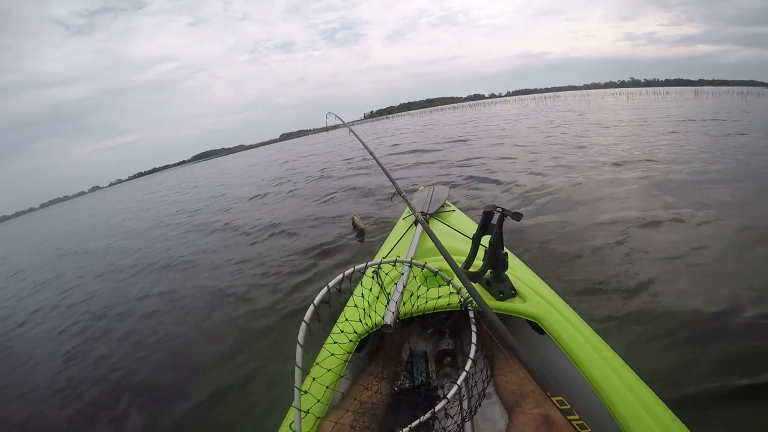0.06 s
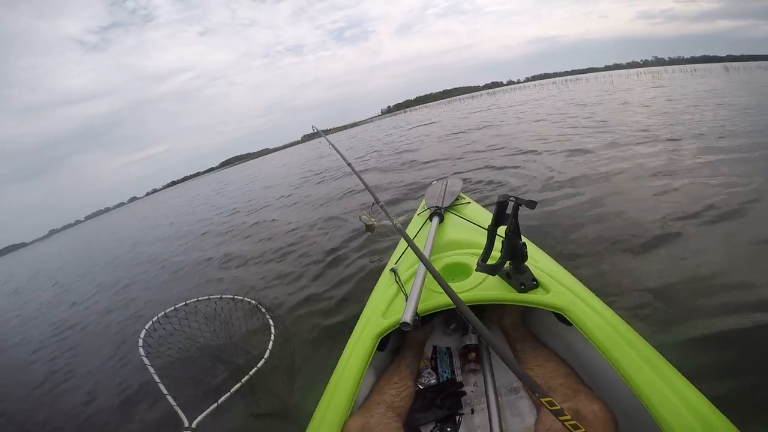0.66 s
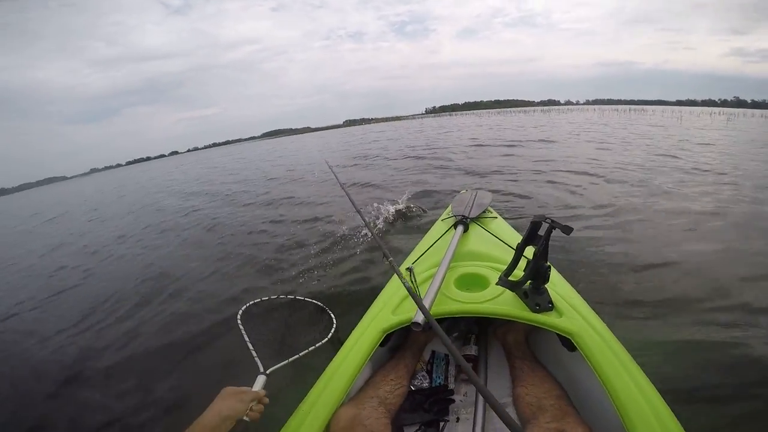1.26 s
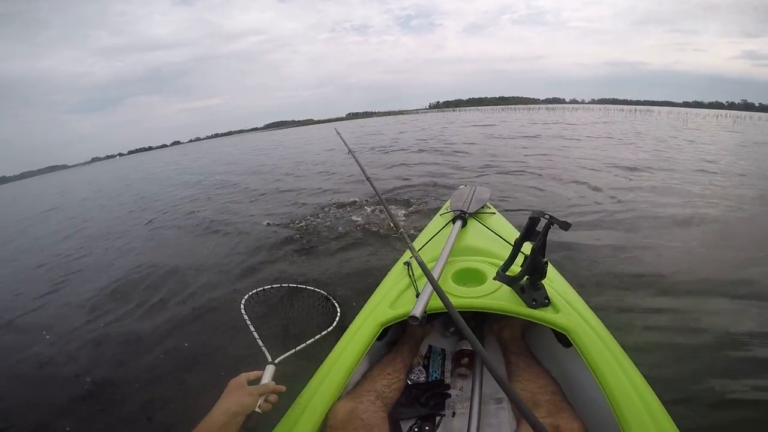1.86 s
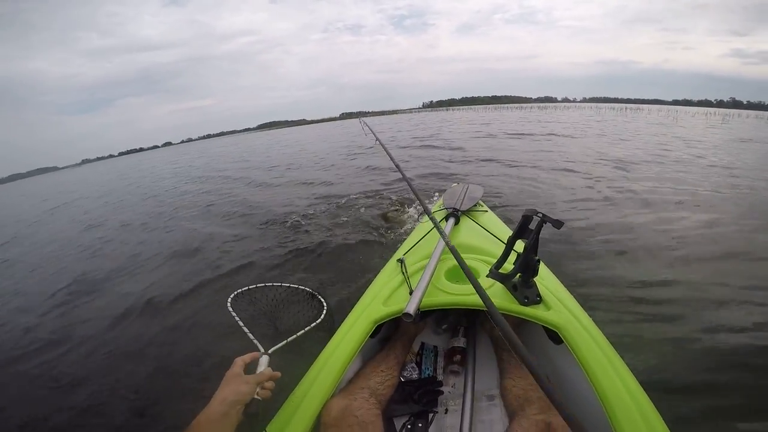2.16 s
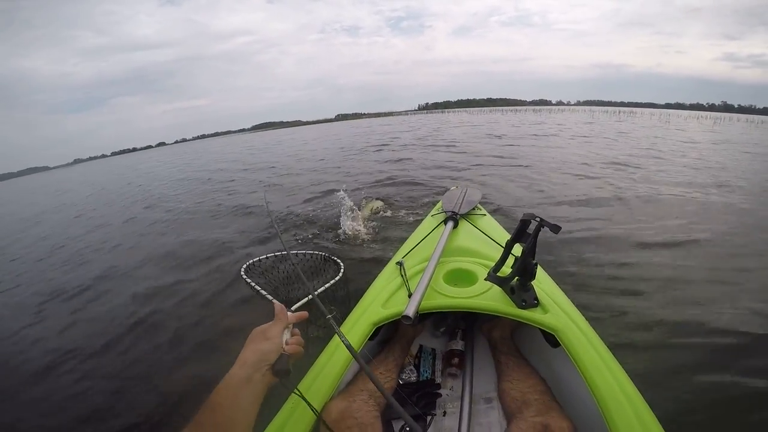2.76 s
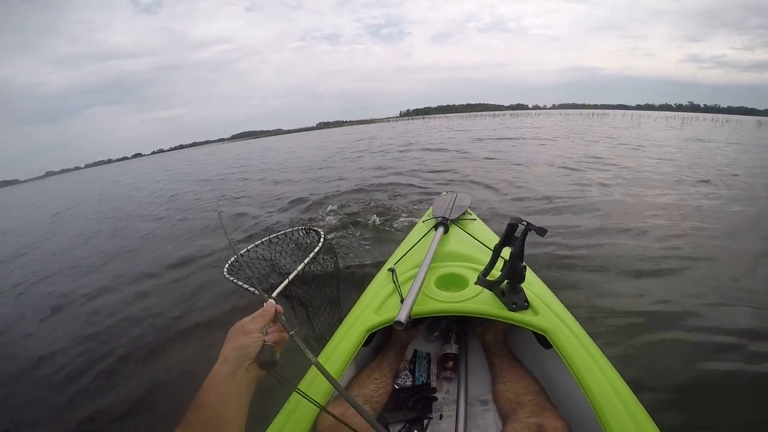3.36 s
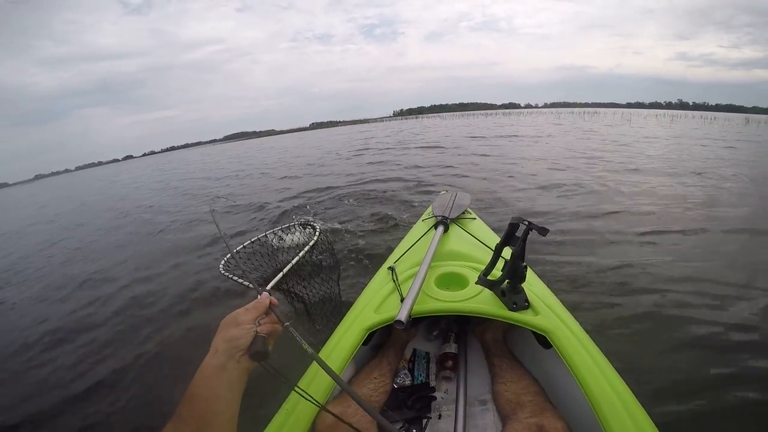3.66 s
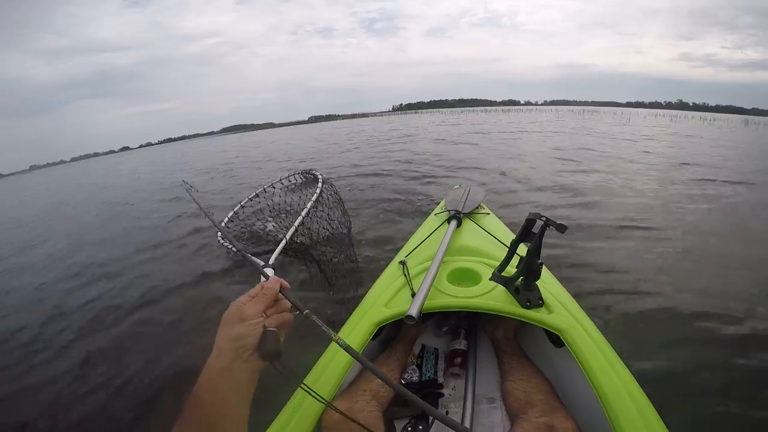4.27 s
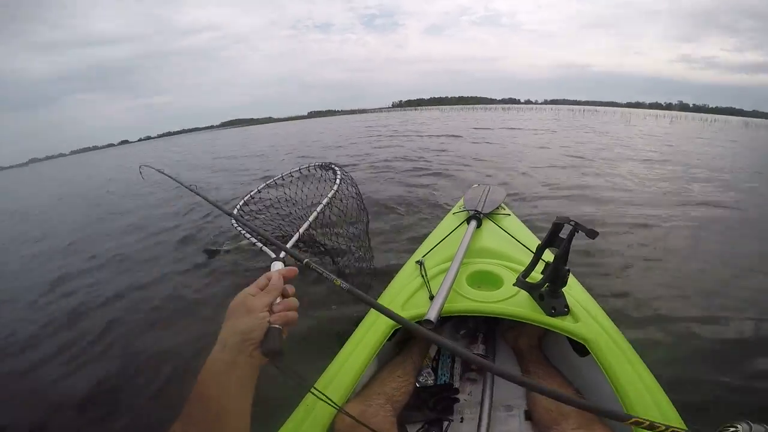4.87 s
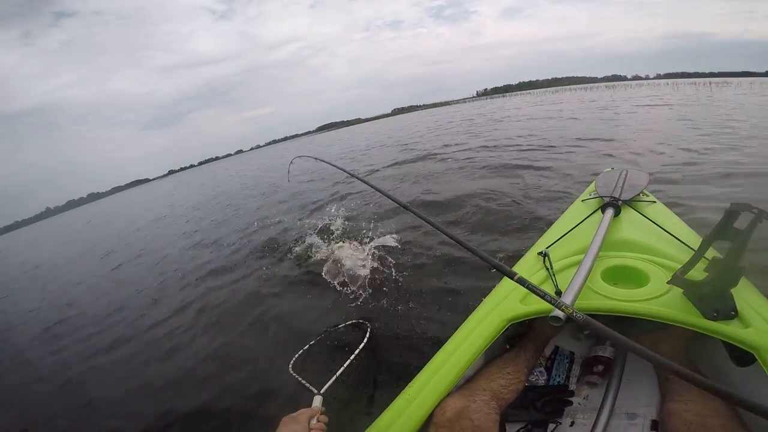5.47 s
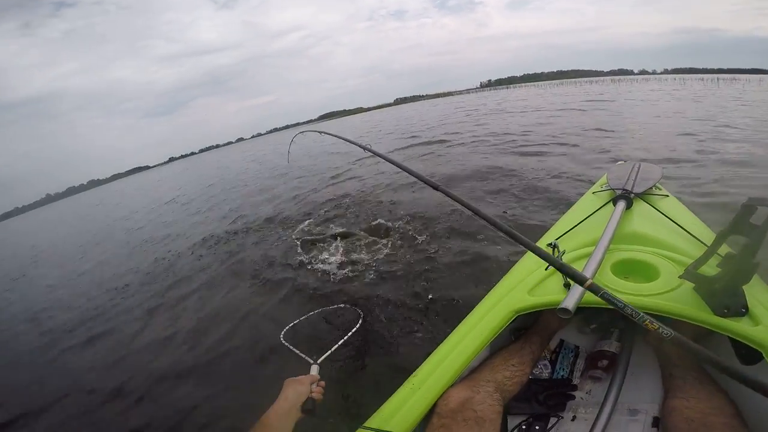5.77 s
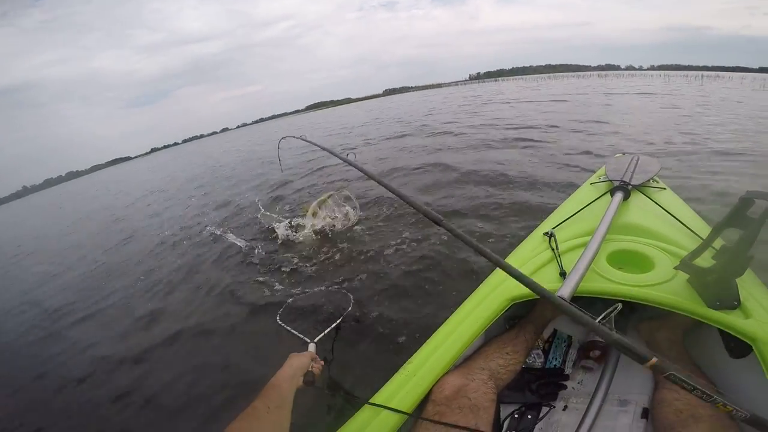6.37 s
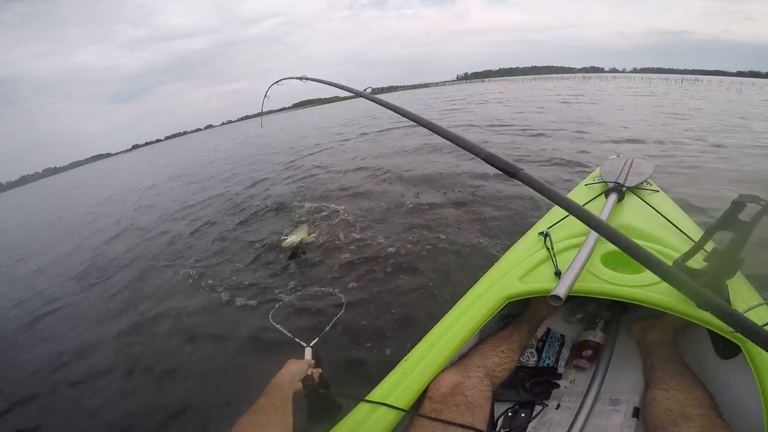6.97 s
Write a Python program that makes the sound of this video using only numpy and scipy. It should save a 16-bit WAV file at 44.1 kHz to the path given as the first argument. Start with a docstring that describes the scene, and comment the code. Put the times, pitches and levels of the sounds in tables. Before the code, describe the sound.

Bursts of splashing and plopping from a fish fighting next to a kayak, pausing briefly, over faint wind rumble and hiss.

```python
"""A kayak on open water, heard from the seat through the ringing plastic housing of a body-worn camera.
Low wind rumble, hiss and a thin electronic whine run throughout. First the line rubs, the reel ticks and
the tackle knocks. Just after 1 s a hooked fish thrashes alongside: drops plink, sheets of spray fly, the
tail slaps, air pockets gulp shut, the hull takes one dull bump and tiny drops land close by. Near 4 s the
fish rests and the tackle knocks and rustles; from 5.2 s it thrashes again and the wind buffets harder."""
import sys
import numpy as np
from scipy import signal
from scipy.fft import rfft, irfft, next_fast_len
from scipy.io import wavfile
from scipy.ndimage import uniform_filter1d, map_coordinates

SR = 44100
rng = np.random.default_rng(int(sys.argv[2]) if len(sys.argv) > 2 else 0)


def dump_mix(stems):
    """Bounce the given channels to the path in sys.argv[1] as a 16-bit WAV at rate SR."""
    frames = np.atleast_2d(stems).T  # one column per channel
    limited = np.clip(frames, -1, 1)  # hard clip at full scale
    pcm = np.round(limited * 32767).astype(np.int16)
    wavfile.write(sys.argv[1], SR, pcm)


N = 309582


def amp(db):
    """Decibels to gain."""
    return 10 ** (np.asarray(db) / 20)


def unit(x):
    """Scale to rms 1."""
    return x / np.sqrt(np.mean(x ** 2) + 1e-20)


def clock(count):
    """Sample times in seconds."""
    return np.arange(count) / SR


def wobble(rate):
    """A smooth random curve with rate knots a second."""
    return map_coordinates(rng.standard_normal(int(N * rate / SR) + 4), [clock(N) * rate])


def swell(start_s, attack_s, hold_s, t60_s):
    """Rise, hold, then die away."""
    t = clock(N) - start_s
    return np.clip(t / attack_s, 0, 1) * amp(-60 * np.clip((t - attack_s - hold_s) / t60_s, 0, 2))


def filtered(x, response):
    """Multiply the spectrum of x by a response of frequency."""
    size = next_fast_len(len(x) + 4096)
    return irfft(rfft(x, size) * response(np.fft.rfftfreq(size, 1 / SR)), size)[:len(x)]


def coloured(x, points):
    """Shape x by (frequency_hz, level_db) points on a log axis."""
    hz, db = np.transpose(points)
    return filtered(x, lambda f: amp(np.interp(np.log(f + 1), np.log(hz), db)))


def resonate(x, modes):
    """Ring (pitch_hz, width_hz, gain_db) resonances with x."""
    return filtered(x, lambda f: sum(amp(db) * 1j * f * width / (hz * hz - f * f + 1j * f * width)
                                     for hz, width, db in modes))


def band(x, edge_hz, kind, order):
    """Causal low, high or band pass."""
    sections = signal.butter(order, np.clip(edge_hz, 1, SR / 2 - 1), kind, fs=SR, output="sos")
    return signal.sosfilt(sections, x)


def noise_burst(t, t60_s):
    """White noise that falls 60 dB in t60_s."""
    return rng.standard_normal(len(t)) * amp(-60 * t / t60_s)


def add(track, start_s, sound, level_db):
    """Mix a sound in with its loudest 2 ms at level_db."""
    power = uniform_filter1d(sound ** 2, 88).max()
    part = track[max(round(start_s * SR), 0):][:len(sound)]
    part += amp(level_db) * sound[:len(part)] / np.sqrt(power + 1e-20)


# wind on the microphone, stronger while the rod is hauled up: time_s, level_db
WIND = [(0, -55), (1.1, -50), (2.7, -47.5), (4.2, -49.5), (5.25, -48), (5.5, -40), (6.75, -40),
        (7.02, -44.5)]
# gusts on top of it: centre_s, rise_db, half_length_s
GUSTS = [(1.36, 10, .11), (4.607, 4.5, 0.13), (5.556, 4.5, .04), (5.979, 9.5, 0.045), (6.781, 7, 0.013)]
# spectra of buffeting and of handling, right on the housing: frequency_hz, relative_db
BUFFET_SPECTRUM = [(10, -22), (20, 2), (32, -2.5), (48, -2), (58, -6.5), (72, -29.5), (150, -48.5),
                   (400, -100)]
HANDLING_SPECTRUM = [(35, -6), (55, 4), (66, 4), (80, -5.5), (100, -10), (130, -21), (180, -48),
                     (400, -44.5), (1000, -100)]
def wind_rumble():
    """Wind buffets the microphone, and handling rumble on the housing swells with it."""
    t = clock(N)
    gusts_db = sum(db * np.exp(-((t - centre_s) / half_s) ** 2) for centre_s, db, half_s in GUSTS)
    flutter_db = 1.43 * wobble(rate=7)
    wind_db = np.interp(t, *np.transpose(WIND)) + gusts_db + flutter_db
    calm_db = -50
    handling_db = -58.5 + 1.23 * (wind_db - calm_db)
    buffeting = amp(wind_db) * unit(coloured(rng.standard_normal(N), BUFFET_SPECTRUM))
    handling = amp(handling_db) * unit(coloured(rng.standard_normal(N), HANDLING_SPECTRUM))
    return buffeting + handling


# the microphone's noise floor: frequency_hz, relative_db
HISS_SPECTRUM = [(60, 6), (150, 7.5), (300, 0.5), (600, -4.5), (1200, -7), (2200, -9), (2900, -8),
                 (4000, -11), (6000, -9.5), (7300, -16), (8600, -15.5), (9500, -18.5), (13500, -18.5),
                 (15000, -22.5)]
def microphone_hiss():
    """The microphone's own steady noise lies under everything."""
    return amp(-63) * unit(coloured(rng.standard_normal(N), HISS_SPECTRUM))


def camera_whine(pitch_hz=6308.7, frame_hz=29.97):
    """The camera's electronics sing at one pitch, restarting with every picture frame."""
    phase = 2 * np.pi * pitch_hz * (clock(N) % (1 / frame_hz))
    return np.sqrt(2) * (amp(-68) * np.sin(phase) + amp(-85.5) * np.sin(2 * phase))


# strokes of line and net, within reach: start_s, relative_db, attack_s, hold_s, t60_s
RUBS = [(0, -63, 0.0072, 0.025, .5), (0.734, -72, .04, .04, .2), (4.798, -60.5, 0.11, 0.11, 0.45)]
# spectrum of the rubbing: frequency_hz, relative_db
RUB_SPECTRUM = [(1000, -36), (2000, 2.5), (2600, -5), (3050, 10), (3600, -6), (4400, 0.5), (5100, -6),
                (5600, -19), (6900, -11), (7500, -9), (8500, -22), (15000, -30)]
def line_rubs():
    """Line and net stick and slip, rustling unevenly through each stroke."""
    slips = rng.standard_normal(N) * amp(3.5 * wobble(rate=110))
    strokes = sum(amp(db) * swell(start_s, *shape) for start_s, db, *shape in RUBS)
    return amp(-3.5) * strokes * unit(coloured(slips, RUB_SPECTRUM))


# clicks of the reel, in the hand: start_s, relative_db
REEL_TICKS = [(0.041, -46), (0.781, -48), (0.8, -43), (0.825, -50.5), (5.0035, -46)]
# resonances of the reel: pitch_hz, width_hz, gain_db
REEL_MODES = [(2900, 740, -4), (4310, 430, 3), (4770, 460, -7), (7200, 470, -23)]
def reel_ticks():
    """Each small click rings the reel briefly."""
    out, t = np.zeros(N), clock(8192)
    for start_s, db in REEL_TICKS:
        ring = resonate(noise_burst(t, t60_s=0.04), REEL_MODES)
        add(out, start_s, band(ring, 7000, "low", order=2), db - 8)
    return out


# knocks of rod and net, aboard the kayak: start_s, relative_db, t60_s, cutoff_hz
KNOCKS = [(0.297, -42.5, 0.067, 5060), (4.122, -37.5, 0.086, 6300), (4.205, -54, 0.09, 4000),
          (4.268, -58, .06, 6000), (5.18, -46.5, 0.1, 2400)]
# resonances of the tackle: pitch_hz, width_hz, gain_db
TACKLE_MODES = [(1160, 210, -3), (2010, 210, 2), (2490, 260, 8), (2750, 200, 1), (2860, 180, 6),
                (3960, 110, 4), (5100, 400, -10), (5900, 620, -26), (7400, 410, -31)]
def tackle_knocks():
    """Rod and net clack together, rattle for 5 ms, then settle."""
    out, t = np.zeros(N), clock(8192)
    for start_s, db, t60_s, cutoff_hz in KNOCKS:
        chatter = noise_burst(np.maximum(t - 0.005, 0), t60_s)
        ring = resonate(chatter, TACKLE_MODES)
        add(out, start_s, band(ring, cutoff_hz, "low", order=2), db - 5.5)
    return out


# resonances of the camera housing around the microphone: pitch_hz, width_hz, gain_db
HOUSING_MODES = [(960, 530, -11), (1490, 89, -6.5), (2036, 220, 0.5), (2738, 470, 2.5), (2926, 106, -4.5),
                 (4240, 600, -3.5), (4893, 200, 4.5), (5640, 390, -4), (6060, 190, -2.5), (7460, 270, -4),
                 (9900, 2400, -13.5), (13100, 3800, -10)]
def housing(x):
    """The plastic shell rings at its resonances and leaks a little of everything."""
    return band(resonate(x, HOUSING_MODES), 6200, "low", order=1) + amp(-22) * x


def bubble(t, pitch_hz, t60_s, rise):
    """A bubble rings and, nearing the surface, climbs in pitch by the share rise every t60_s."""
    phase = 2 * np.pi * pitch_hz * t * (1 + rise * t / t60_s / 2)
    return np.sin(phase) * amp(-60 * t / t60_s)


# single drops on the water beside the kayak: start_s, relative_db, pitch_hz
PLINKS = [(1.141, -40, 4900), (1.409, -44.5, 2700), (1.499, -34, 5040), (1.993, -30, 1964),
          (2.739, -39.5, 1500), (3.168, -39, 4950), (3.207, -37, 4870), (3.372, -39, 1950),
          (5.438, -31.5, 2070), (6.28, -36, 1980), (6.748, -31, 1834), (6.778, -38, 4940)]
def drop_plinks():
    """A drop lands with a faint tick and traps one bubble that rings cleanly."""
    out, t = np.zeros(N), clock(4096)
    for start_s, db, pitch_hz in PLINKS:
        impact = 0.48 * noise_burst(t, t60_s=0.066)
        ring = bubble(t, pitch_hz, t60_s=0.024, rise=0.088)
        onset = 1 - np.exp(-t / 0.00021)
        add(out, start_s, housing((ring + impact) * onset), db - 14)
    return out


def bubble_stream(per_second, low_hz, high_hz, cycles, spread_db, samples):
    """Bubbles of many sizes ring at random times, each dying away over the same number of cycles."""
    when, pitch, strength = rng.random((int(per_second * N / SR), 3)).T[:, :, None]
    pitch_hz = low_hz * (high_hz / low_hz) ** pitch
    gain = amp(-spread_db * np.log(np.maximum(strength, 0.02)))
    rings = gain * bubble(clock(samples), pitch_hz, t60_s=cycles / pitch_hz, rise=0.66)
    positions = (when * N).astype(int) + np.arange(samples)
    return unit(np.bincount(positions.ravel(), rings.ravel(), N)[:N])


# sheets of water thrown alongside, levels relative: start_s, splash_db, spray_db, gulp_db, hold_s, t60_s
THRASHES = [(1.161, -58.5, -56, -77, 0.013, .4), (1.204, -53.5, -55.5, -65, 0.019, 0.4),
            (1.301, -61, -63.5, -68, 0.0083, 0.79), (1.507, -60, -62, -70, .015, .3),
            (1.537, -53.5, -55, -59.5, 0.057, 0.63), (1.673, -59, -59, -74, 0.13, 0.64),
            (2.031, -56.5, -62, -60, 0.019, 0.53), (2.125, -63, -66.5, -77, 0.13, 0.93),
            (2.532, -57, -61, -68, .02, 0.61), (2.657, -54, -57.5, -68, .015, .3),
            (2.728, -62, -63.5, -72, 0.13, 0.28), (2.913, -56.5, -62.5, -70, 0.061, .5),
            (3.022, -54, -57, -66.5, 0.037, 0.58), (3.1, -63.5, -62, -76, 0.15, 0.86),
            (3.23, -67, -55, -76, .012, .1), (3.338, -59, -63, -74, 0.035, 0.59),
            (3.592, -56, -58.5, -71, .005, 0.14), (3.628, -56.5, -58.5, -63, 0.032, 0.55),
            (3.766, -66, -69, -71.5, 0.18, 0.32), (5.253, -56.5, -55.5, -67, 0.044, 0.48),
            (5.31, -55, -56, -64, 0.071, 0.46), (5.406, -54.5, -53, -63.5, 0.018, 0.55),
            (5.491, -57, -56.5, -68.5, 0.13, 0.68), (5.574, -56.5, -54, -63.5, 0.059, 0.91),
            (5.779, -61, -64, -69, 0.14, 1.5), (6.126, -57.5, -62.5, -84, 0.0043, 0.34),
            (6.206, -61.5, -56, -65.5, 0.044, 0.34), (6.257, -58, -60.5, -63.5, 0.1, 0.63),
            (6.476, -60, -59, -72, 0.04, 1.46), (6.712, -58.5, -59, -64, 0.027, 0.67)]
# spectrum of gulping air: frequency_hz, relative_db
GULP_SPECTRUM = [(120, 2), (300, -5.5), (500, -8.5), (750, -5.5), (1000, -3.5), (1300, -9.5), (2000, -9),
                 (5000, -60)]
def thrashing(attack_s=0.0072):
    """Each beat of the fish tears the water into coarse bubbles, fine spray and deep gulps over foam."""
    power = np.zeros((3, N))  # overlapping sheets add in power
    for start_s, splash_db, spray_db, gulp_db, hold_s, t60_s in THRASHES:
        sheet = swell(start_s, attack_s, hold_s, t60_s)
        pockets = swell(start_s, attack_s, hold_s, 0.81 * t60_s)  # they close before the spray settles
        power[0] += (amp(splash_db) * sheet) ** 2
        power[1] += (amp(spray_db) * sheet) ** 2
        power[2] += (amp(gulp_db) * pockets) ** 2
    splash, spray, gulp = np.sqrt(power)
    violence = np.clip(spray / amp(-47), 0, 1)
    froth = 0.32 + 0.43 * violence  # in a hard thrash single bubbles merge into a wash
    foam = np.sqrt(froth) * rng.standard_normal((3, N))
    clumps = amp(1.7 * wobble(rate=140))  # the water comes down in blobs a few milliseconds long
    streams = np.array([
        bubble_stream(per_second=800, low_hz=1408, high_hz=3546, cycles=45, spread_db=1, samples=768),
        bubble_stream(per_second=1100, low_hz=3646, high_hz=10520, cycles=43, spread_db=0, samples=256),
        bubble_stream(per_second=350, low_hz=390, high_hz=1367, cycles=17, spread_db=1, samples=1400)])
    coarse, fine, deep = np.sqrt(1 - froth) * streams + foam
    coarse = unit(band(housing(clumps * coarse), [1250, 3600], "band", order=3))
    fine = unit(band(housing(clumps * fine), 3000, "high", order=4))
    deep = unit(coloured(deep, GULP_SPECTRUM))
    fizz = unit(band(rng.standard_normal(N), [8500, 14000], "band", order=2))
    mist = amp(-16) * violence * spray * fizz  # harder beats atomise more water
    return splash * coarse + amp(0.5) * spray * fine + amp(1) * gulp * deep + mist


# the hardest slaps of the fish, beside the hull: start_s, relative_db, pitch_hz, length_s
SLAPS = [(1.168, -46, 4670, 0.0043), (1.209, -42, 5020, .004), (1.229, -39, 4890, 0.005),
         (1.329, -40, 2480, 0.0044), (1.556, -54, 2130, 0.0036), (1.573, -42, 2820, 0.0081),
         (2.017, -41.5, 4610, 0.014), (2.041, -38.5, 2840, 0.003), (2.541, -40.5, 4630, 0.0027),
         (2.564, -41, 4630, 0.0037), (2.671, -35.5, 1680, .009), (2.848, -39.5, 2970, 0.0096),
         (2.922, -41.5, 2720, .005), (2.984, -38.5, 2000, 0.0045), (3.005, -38.5, 5100, .004),
         (3.09, -39, 2020, .008), (3.133, -40, 4780, .006), (3.243, -38, 4900, 0.0068),
         (3.598, -41.5, 1880, .003), (3.64, -37, 4710, 0.013), (3.684, -41, 1760, 0.0083),
         (3.921, -46.5, 3100, 0.0061), (3.981, -43.5, 2640, 0.0061), (5.241, -40, 2890, 0.0024),
         (5.31, -33.5, 5000, 0.0094), (5.423, -35.5, 2020, 0.0075), (5.465, -39, 5000, .006),
         (5.686, -31.5, 2340, 0.0027), (5.754, -39.5, 2730, .004), (6.134, -41.5, 2680, .005),
         (6.211, -41, 5470, .004), (6.491, -42.5, 2030, .004), (6.565, -36.5, 2760, .004),
         (6.71, -39, 2710, 0.0088), (6.727, -30.5, 2715, 0.0056), (6.995, -48, 2430, 0.0073)]
def tail_slaps(yield_s=0.0009):
    """Each slap is a short burst of droplets and one trapped bubble, choked off as the water closes."""
    out, t = np.zeros(N), clock(4096)
    for start_s, db, pitch_hz, length_s in SLAPS:
        envelope = np.exp(-(t / length_s) ** 2) + 0.22 * amp(-60 * t / 0.12)
        envelope *= 1 - np.exp(-t / yield_s)  # water yields, so the slap swells in
        burst = rng.standard_normal(len(t)) * envelope
        droplets = resonate(burst, [(pitch_hz, 1.2 * pitch_hz, 0)]) + 0.035 * burst
        ping = envelope * bubble(t, pitch_hz, t60_s=0.031, rise=0.32)
        add(out, start_s, unit(housing(droplets)) + 0.8 * unit(housing(ping)), db - 9)
    return out


# large air pockets closing beside the kayak: start_s, relative_db, pitch_hz
PLOPS = [(1.185, -54, 950), (2.291, -53.5, 830), (2.545, -49.5, 1025), (2.666, -47, 533), (3.048, -49, 620),
         (3.64, -47, 1390), (5.32, -48, 640), (5.342, -44, 466), (5.438, -42, 1044), (5.927, -54, 397),
         (6.3, -46.5, 520), (6.357, -44.5, 820), (6.72, -48.5, 900), (6.725, -44, 281)]
def cavity_plops():
    """The cavity behind the tail collapses into a big, low bubble."""
    out, t = np.zeros(N), clock(4096)
    for start_s, db, pitch_hz in PLOPS:
        slosh = unit(coloured(rng.standard_normal(len(t)), GULP_SPECTRUM) * amp(-60 * t / 0.053))
        ring = unit(bubble(t, pitch_hz, t60_s=0.056, rise=0.26))
        onset = 1 - np.exp(-t / 0.00088)
        add(out, start_s, (ring + 0.83 * slosh) * onset, db - 6)
    return out


def hull_bump(start_s, knock_db, boom_db):
    """A soft blow on the hollow hull, below the microphone: a brief knock over a longer boom."""
    out, t = np.zeros(N), clock(16384)
    knock = band(rng.standard_normal(len(t)), [200, 416], "band", order=2) * amp(-60 * t / 0.14)
    boom = band(rng.standard_normal(len(t)), [55, 148], "band", order=3) * amp(-60 * t / 0.31)
    add(out, start_s, knock, knock_db)
    add(out, start_s + 0.008, boom, boom_db)
    return out


# tiny drops landing close to the microphone: start_s, relative_db
PATTER = [(2.027, -48), (2.088, -45), (5.427, -44), (6.544, -51)]
def drop_patter():
    """Tiny drops tick sharply, too short to trap air."""
    out, t = np.zeros(N), clock(1024)
    for start_s, db in PATTER:
        tick = noise_burst(t, t60_s=0.0063)
        add(out, start_s, band(housing(tick) + 0.02 * tick, 7000, "high", order=4), db - 6)
    return out


def scene():
    """Open water returns no echo: the sources simply add at one microphone."""
    hull = hull_bump(start_s=1.321, knock_db=-47, boom_db=-42.5)
    water = thrashing() + tail_slaps() + drop_plinks() + cavity_plops() + drop_patter()
    tackle = tackle_knocks() + reel_ticks() + line_rubs()
    background = wind_rumble() + microphone_hiss() + camera_whine()
    return (background + tackle + water + hull)[None]


def record(dry):
    """The camera keeps nothing above 15.4 kHz."""
    return np.array([filtered(channel, lambda hz: hz < 15400) for channel in dry])


dry = scene()
out = record(dry)
dump_mix(out)
```